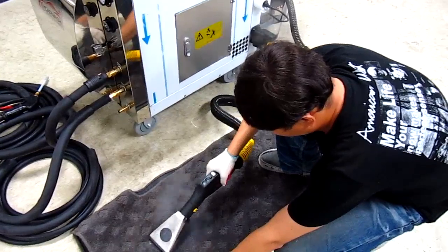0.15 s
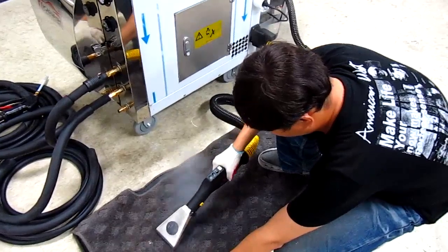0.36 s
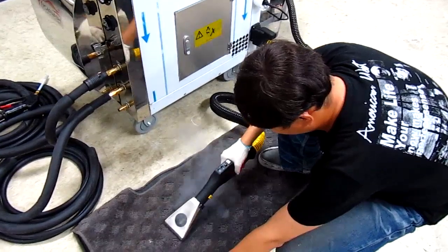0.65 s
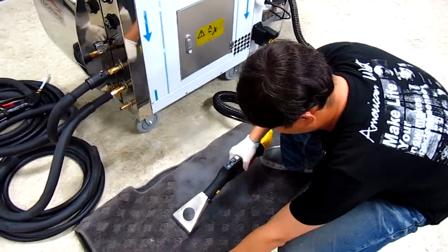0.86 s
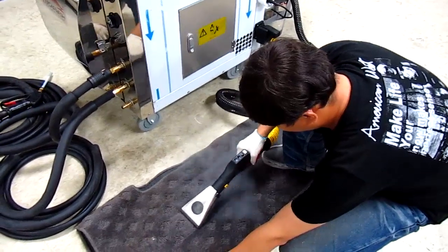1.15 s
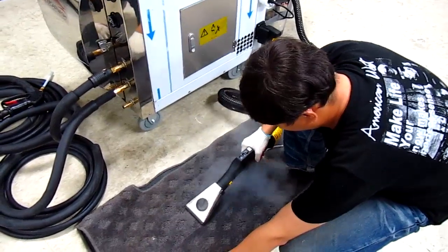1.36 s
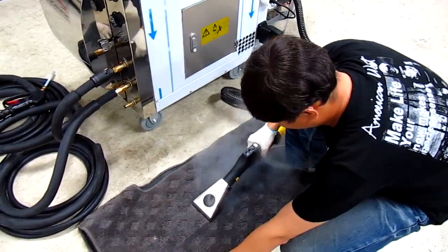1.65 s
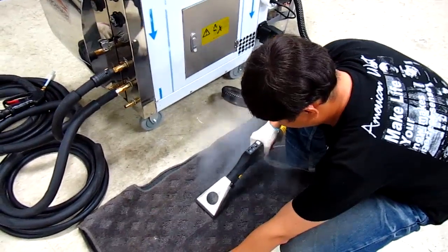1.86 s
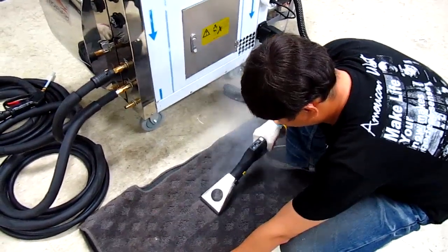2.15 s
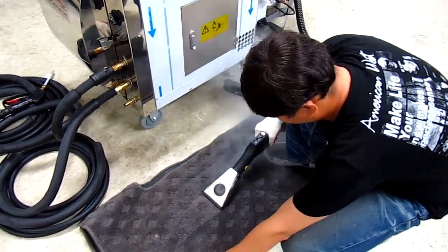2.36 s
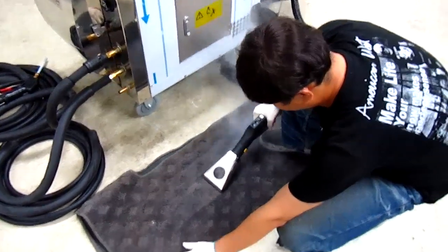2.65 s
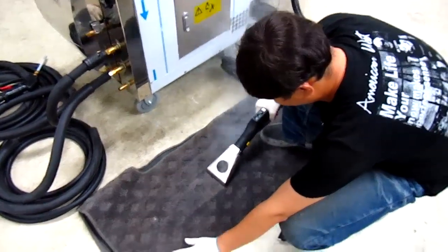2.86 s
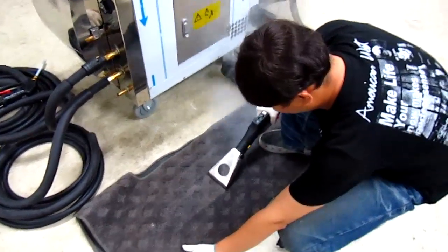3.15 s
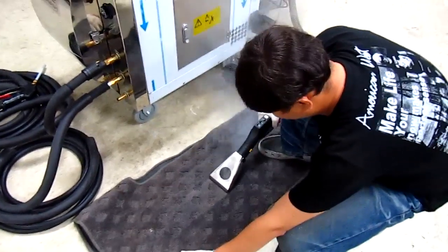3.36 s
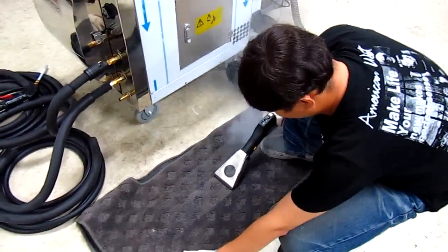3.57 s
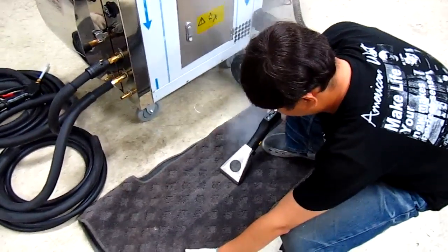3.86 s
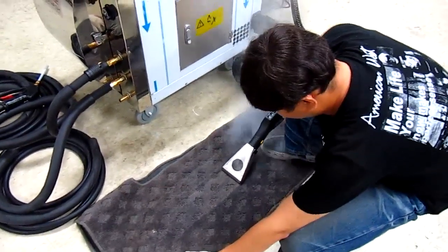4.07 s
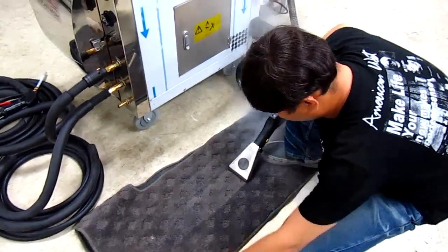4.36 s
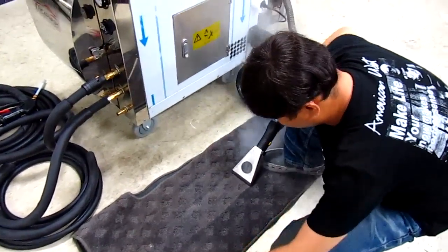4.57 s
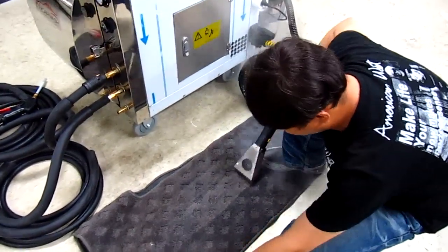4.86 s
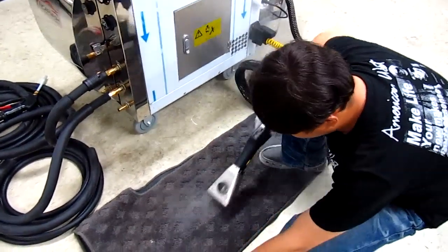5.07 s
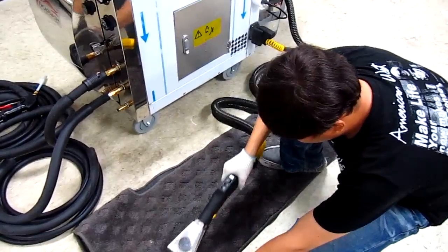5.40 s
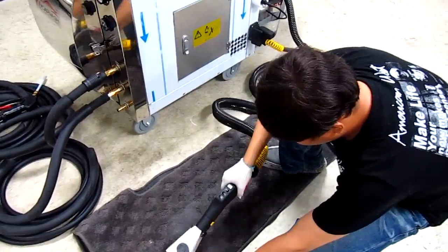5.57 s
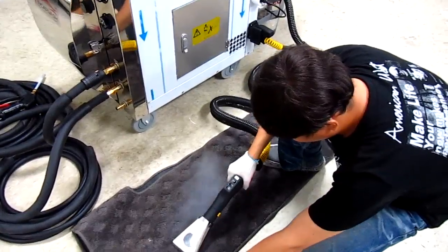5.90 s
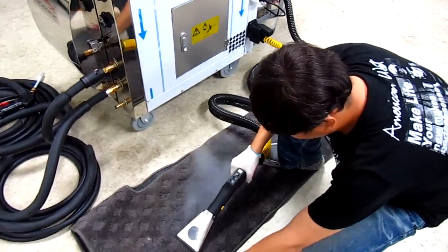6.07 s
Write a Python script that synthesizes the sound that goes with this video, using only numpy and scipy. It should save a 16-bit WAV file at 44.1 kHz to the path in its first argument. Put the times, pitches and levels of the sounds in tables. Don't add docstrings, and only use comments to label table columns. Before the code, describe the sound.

In a workshop, close to a hand-held microphone, a vacuum turbine holds a steady mid-low howl from the start. Air roars in its hose and rasps through a nozzle slot on a rubber mat, while bright steam hisses with a shifting hollow tone. Small water spits crackle midway. At the very end the machine abruptly vanishes and a loud, wide open steam jet bursts in.

```python
import sys
import numpy as np
from scipy import signal
from scipy.fft import rfft, irfft
from scipy.io import wavfile
from scipy.ndimage import uniform_filter1d, map_coordinates

SR = 44100
rng = np.random.default_rng(int(sys.argv[2]) if len(sys.argv) > 2 else 0)


def generate_wav(sig):
    pcm = np.round(np.clip(np.atleast_2d(sig).T, -1, 1) * 32767).astype(np.int16)
    wavfile.write(sys.argv[1], SR, pcm)


def amplitude_ratio(level_db):
    exponent = np.asarray(level_db, float) / 20
    return 10 ** exponent


N = 275184
CUT_S = 6.158

# [t/s, blade rate f/Hz]
SPEED = [(0, 340.4), (.9, 341.2), (2.1, 341.7), (3.75, 341.9), (4.1, 340), (4.45, 338.2), (4.7, 338.2),
         (5.1, 339.3), (5.7, 340.6), (6.15, 341)]


def unit(x):
    return x / np.sqrt(np.mean(x ** 2) + 1e-20)


def along(points, hz):
    f, v = np.transpose(points)
    return np.interp(np.log(hz + 1), np.log(f + 1), v)


def curves(rows, t=None):
    if t is None:
        t = np.arange(N) / SR
    knot_s, *cols = np.transpose(rows)
    return [np.interp(t, knot_s, c) for c in cols]


def wobble(rate_hz):
    knots = rng.standard_normal(int(N * rate_hz / SR) + 4)
    return map_coordinates(knots, [np.arange(N) * rate_hz / SR])


def swells(rows):
    t = np.arange(N) / SR
    return sum(height * np.exp(-((t - s) / lasts_s) ** 2) for s, lasts_s, height in rows)


def rush(gain, patchy_db, alike=None, size=1024):
    # [f/Hz, correlation]
    room_alike = [(30, .6), (90, 0.99), (150, 0.96), (600, 0.96), (1100, 0.99), (1600, 1), (2800, 0.96),
                  (3900, 0.97), (5200, 0.91), (8000, 0.85), (12000, 0.37)]
    hz, t, z = signal.stft(rng.standard_normal((2, N)), SR, nperseg=size)
    field = uniform_filter1d(rng.standard_normal(z.shape[1:]), size=10, axis=0)
    field = uniform_filter1d(field, size=6, axis=1)
    shape = gain(hz[:, None], t) * np.ones(z.shape[1:])
    z = z * shape / np.sqrt(np.mean(shape ** 2, axis=0)) * amplitude_ratio(patchy_db * unit(field))
    likeness = along(room_alike if alike is None else alike, hz)
    turn = np.arccos(np.clip(likeness, -1, 1))[:, None] / 2
    mid, side = z[0] * np.cos(turn), z[1] * np.sin(turn)
    stereo = signal.istft(np.array([mid + side, mid - side]), SR, nperseg=size)[1]
    return unit(stereo[:, :N])


def fixed(spectrum):
    return lambda hz, t: amplitude_ratio(along(spectrum, hz))


def sag_hz():
    full_hz, load_leads_s = 341.9, 0.025
    return full_hz - curves(SPEED, np.arange(N) / SR + load_leads_s)[0]


def turbine():
    # [level/dB at full speed, dB per Hz sag, dB per unit lean, dB per unit bend]
    blades = [(-17.5, 1.24, 0, -.5), (-23, 1.1, 1.6, 1.05), (-26, -4.5, -0.5, -1), (-31.5, -3.5, 4.1, 1.5),
              (-35, 0.44, 0.6, 2), (-32.2, -1.4, 2, -1.7)]
    # [level/dB, 1 = relative to blade multiple 3]
    weak = [(-38.5, 0), (-9.5, 1), (-39, 0), (-12.5, 1)]
    # [t/s, lean -2..2, hose bend -1..2]
    posture = [(0, 0.13, -0.16), (.3, -1.2, -0.92), (.75, -1.4, -0.28), (1, -1.1, 0.15), (1.3, -1.4, -0.51),
               (1.6, 0.44, -0.69), (2.1, 0.18, -0.87), (3.0, 0.065, 0.53), (3.15, -0.93, 1.8),
               (3.8, 0.58, 0.78), (4.2, 0.81, 0.36), (4.55, -0.74, -0.62), (4.7, -1.2, 1.7),
               (5.2, -0.16, 0.79), (5.36, 1.1, -1), (5.9, 1.3, -0.58), (6.15, 0.42, -0.14)]
    # [f/Hz, left lead/rad]
    lead = [(340, 0.015), (680, .08), (1020, 0.068), (1700, 0.016), (4100, .02)]
    # [t/s, duration/s, level/dB]
    wall = [
        (.2, 0.58, -39),
        (4.1, 0.15, -37),
        (5.6, 0.62, -39),
    ]

    lean, bend = curves(posture)
    blade_hz = curves(SPEED)[0]
    levels_db = [db + per_sag * sag_hz() + per_lean * lean + per_bend * bend
                 for db, per_sag, per_lean, per_bend in blades]
    weak_db = [db + tied * levels_db[2] for db, tied in weak]
    orders = np.array([6, 12, 18, 24, 30, 36, 7, 21, 42, 72]) / 6
    turn = 2 * np.pi * np.cumsum(blade_hz + 0.3 * wobble(20)) / SR
    out = np.zeros((2, N))
    for k, db in enumerate(levels_db + weak_db):
        lag = along(lead, orders[k] * blade_hz[0]) * np.array([[1], [-1]])
        drift = 0.06 * min(orders[k], 6) ** 2 * (wobble(0.7) - 1)
        strength = np.sqrt(2) * amplitude_ratio(db + 0.44 + 0.44 * wobble(14))
        out += (-1) ** k * strength * np.cos(orders[k] * turn + drift + lag)
    echo = swells([(s, lasts_s, amplitude_ratio(db)) for s, lasts_s, db in wall])
    return out + echo * np.sin(6 * turn) * [[1], [-1]]


def scrape_db():
    # [t/s, duration/s, level/dB]
    scrapes = [(0.054, 0.14, 3.5), (0.553, 0.093, 3), (1.594, 0.26, 3), (2.68, 0.091, 2.5),
               (3.852, .08, -1), (4.474, 0.047, 6), (5.45, 0.13, 1.5)]
    return swells(scrapes)


def hose_gain(hz):
    # [f/Hz, width/Hz, level/dB]
    hose = [(158, 10.5, 3), (198, 23, 2), (375, 36, 4.5), (484, 23, 7.5), (712, 50, 3), (2930, 170, 1)]
    return amplitude_ratio(sum(db / (1 + (2 * (hz - c) / width_hz) ** 2) for c, width_hz, db in hose))


def hose_roar(catch_db):
    # [f/Hz, level/dB per Hz]
    roar = [(40, -37), (130, -11.5), (200, -3.5), (330, -1.5), (480, -4), (680, 2), (900, -6.5), (1500, -7),
            (2200, -13.5), (6000, -47)]
    gust_db = 0.15 * wobble(3.5) + 0.48 * catch_db
    air = rush(lambda hz, t: amplitude_ratio(along(roar, hz)) * hose_gain(hz), patchy_db=1, size=2048)
    return amplitude_ratio(-21.5 + gust_db + 0.75 * wobble(9)) * air


def slot_rasp(catch_db):
    # [f/Hz, level/dB per Hz]
    rasp = [(700, -30), (1300, -9), (2000, -4), (3000, 1), (3400, -4), (3900, -15), (5000, -24.5),
            (10000, -50)]
    per_sag_db = -0.4
    air = rush(lambda hz, t: amplitude_ratio(along(rasp, hz)) * hose_gain(hz), patchy_db=0.7)
    return amplitude_ratio(-25.5 + per_sag_db * sag_hz() + 0.43 * catch_db + 0.46 * wobble(9)) * air


def panel_drum():
    panel = fixed([(50, -28), (72, -7), (88, 0.0), (104, 11.5), (113, -18), (125, -31.5)])
    lumps_db = 2 * wobble(9)
    balance_db = np.array([[0.7], [-0.7]])
    return amplitude_ratio(-35 + lumps_db + balance_db) * rush(panel, patchy_db=1.3, size=4096)


def suction():
    catch_db = scrape_db()
    return hose_roar(catch_db) + slot_rasp(catch_db) + panel_drum()


def steam():
    # [t/s, strength/dB]
    flow = [(0, -27), (.14, -29), (.7, -29), (1.25, -29.5), (1.5, -27.5), (2.1, -28), (2.3, -29.5),
            (3, -27.5), (3.7, -26.5), (3.76, -30), (4.0, -34), (4.185, -37), (4.2, -30.5), (4.36, -30),
            (4.45, -27), (4.58, -30), (5.05, -30), (6.15, -30.5)]
    # [t/s, hollow f/Hz, level/dB over jet]
    hollow = [(0, 6700, -5), (.4, 6600, -23), (.8, 6900, -3), (1.5, 6800, -2), (2.2, 6800, -3),
              (2.75, 6600, -4.5), (2.95, 7150, 0.5), (3.3, 7660, -0.5), (3.68, 6800, 1.5),
              (3.78, 6270, -10), (4.19, 4670, -8), (4.3, 4500, -2), (4.42, 5540, 1), (4.58, 6200, -5.5),
              (5.1, 6330, -7.5), (5.35, 5500, 0), (5.6, 7050, -5), (6.15, 7150, -10)]
    # [f/Hz, level/dB per Hz]
    jet = [(2500, -23), (3900, -7), (4400, -2.5), (6500, 0.5), (7600, -1.5), (9000, -21), (11000, -27),
           (14000, -45)]
    # [f/Hz, level/dB per Hz]
    rim = [(6000, -32), (7600, -3), (8300, 2.5), (9200, -0.5), (10400, -3), (11000, -13), (12500, -30)]
    # [f/Hz, level/dB per Hz]
    fizz = [(8500, -33), (10600, -1.5), (11300, -3), (12600, -1), (13400, -8), (14200, -7), (15200, -17)]
    jet_db, rim_db, fizz_db = -24, -27, -34.5
    jet_grows, rim_grows, fizz_grows = 0.47, 1, 1.24
    rim_per_sag_db = -0.5
    hollow_width_hz = 2050
    undertone, undertone_db, undertone_grows = 0.78, -16, 3.3

    t = np.arange(N) / SR
    strength_db = curves(flow)[0]
    more_db = strength_db - np.mean(strength_db)
    hollow_db = curves(hollow)[1]
    flutter_db = 0.41 * wobble(8)
    flow_db = jet_db + jet_grows * more_db + flutter_db

    def cavity(hz, s):
        hollow_hz = curves(hollow, s)[0]

        def tone(share):
            return 1 / (1 + (2 * (hz - share * hollow_hz) / hollow_width_hz) ** 2) ** 2

        under = amplitude_ratio(undertone_db + undertone_grows * np.interp(s, t, more_db))
        return tone(0.98) + under * tone(undertone)

    hiss = amplitude_ratio(flow_db - 0.08) * rush(fixed(jet), patchy_db=1.0)
    hiss += amplitude_ratio(flow_db + hollow_db) * rush(cavity, patchy_db=2.0, alike=[(6000, 0.97)])
    rim_now_db = rim_db + rim_grows * more_db + rim_per_sag_db * sag_hz() + flutter_db
    hiss += amplitude_ratio(rim_now_db + 0.21 * wobble(12)) * rush(fixed(rim), patchy_db=1.0)
    fizz_now_db = fizz_db + fizz_grows * more_db + flutter_db
    hiss += amplitude_ratio(fizz_now_db + 0.6 * wobble(20)) * rush(fixed(fizz), patchy_db=-1.0)
    return hiss


def water_spits():
    # [t/s, peak level/dB]
    spits = [
        (2.7294, -19),
        (3.243, -17),
        (4.0194, -26),
        (4.1929, -11),
        (4.2894, -22),
    ]
    t = np.arange(N) / SR
    puffs = sum(amplitude_ratio(db - 1.0) * (t > s) * np.exp(-np.abs(t - s) / 0.005) for s, db in spits)
    return puffs * rush(fixed([(3000, -20), (6000, 12), (9000, 8), (15400, 0)]), patchy_db=5)


def open_jet():
    # [f/Hz, level/dB per Hz]
    free_air = [(50, -23), (600, -10), (1000, -6), (1400, -2), (2850, -1), (4100, -10), (5400, -1.5),
                (7400, -1.5), (10000, -5.5), (12700, -12), (15300, -26)]
    thump_db = -25.5 - 60 * np.abs(np.arange(N) / SR - CUT_S) / 0.16
    thump = amplitude_ratio(thump_db) * rush(fixed([(40, -18), (150, 10), (700, -2), (1200, -20)]), patchy_db=1.0)
    wide = [(300, 0.15), (3000, 0.16), (10000, 0.21)]
    return thump + amplitude_ratio(-11.5) * rush(fixed(free_air), patchy_db=2.0, alike=wide)


def bumps():
    # [t/s, level/dB]
    shifts = [(2.72, -37), (3.25, -48), (4.02, -46), (4.3, -42), (6.05, -48)]
    t = np.arange(N) / SR
    push = sum(amplitude_ratio(db) * np.exp(-((t - s) / 0.03) ** 2) * np.sin(2 * np.pi * 30 * (t - s))
               for s, db in shifts)
    return push * amplitude_ratio([[2.5], [-2.5]])


def dull(x):
    top_hz = 14800
    return irfft(rfft(x) / (1 + (np.fft.rfftfreq(N, 1 / SR) / top_hz) ** 60), N)


def scene():
    t = np.arange(N) / SR
    before = np.clip((CUT_S - t) / 0.0017, 0, 1)
    after = np.clip((t - CUT_S) / 0.005, 0, 1)
    steady = dull(turbine() + suction() + steam())
    return (steady + water_spits() + bumps()) * before + open_jet() * after


def low_pass(x):
    return signal.sosfilt(signal.butter(12, 15360, fs=SR, output="sos"), x)


def record(dry):
    x = dry * amplitude_ratio([[0.3], [-0.3]])
    x = x / (1 + np.abs(x / 0.97) ** 12) ** (1 / 12)
    return low_pass(x)


dry = scene()
out = record(dry)
generate_wav(out)
```